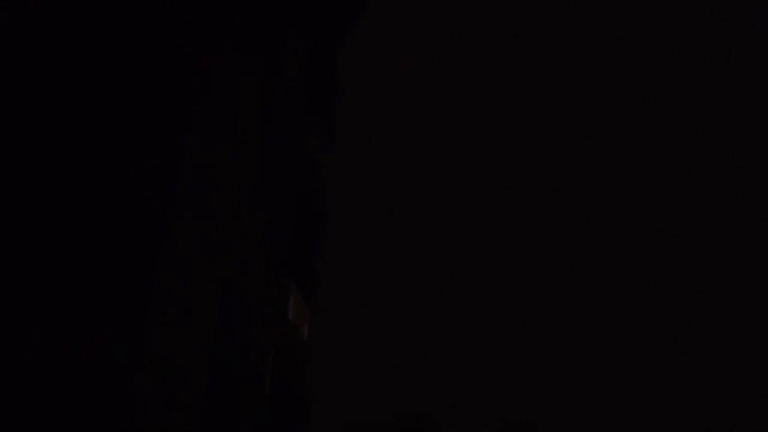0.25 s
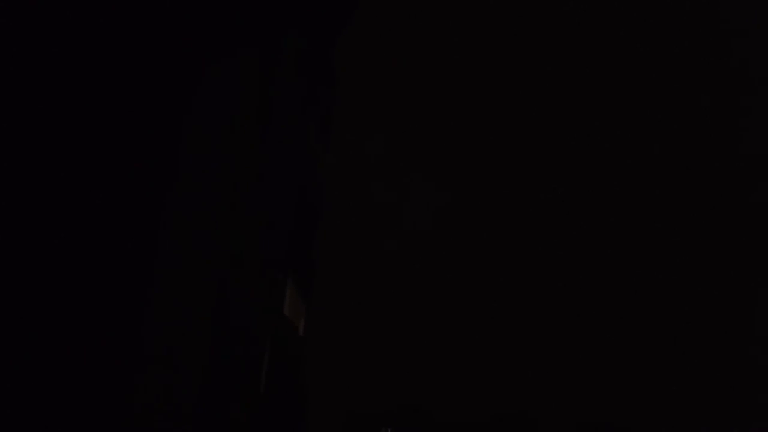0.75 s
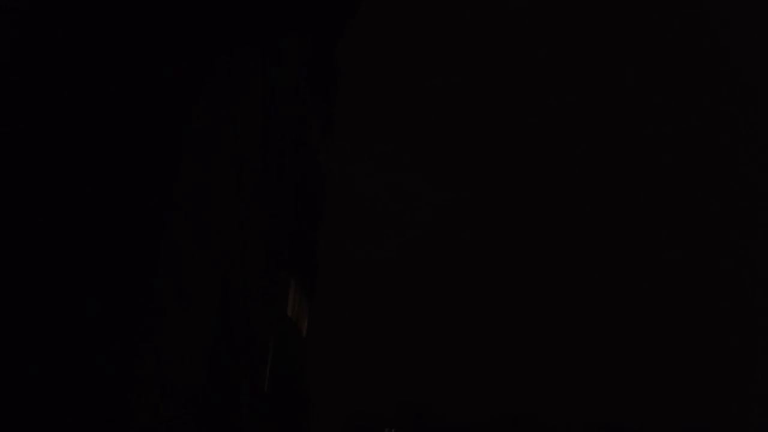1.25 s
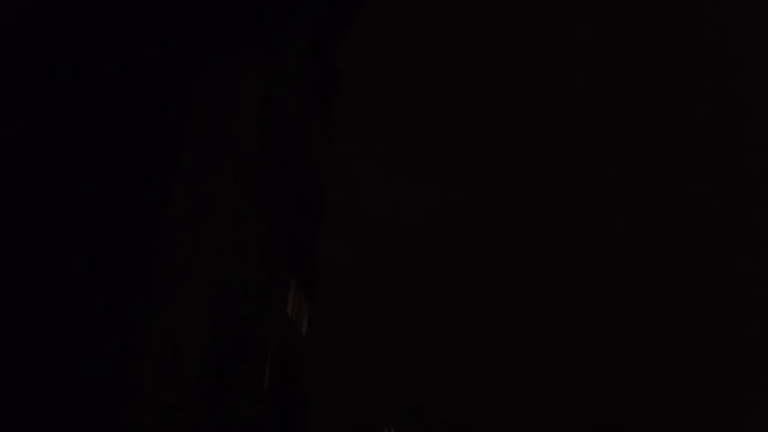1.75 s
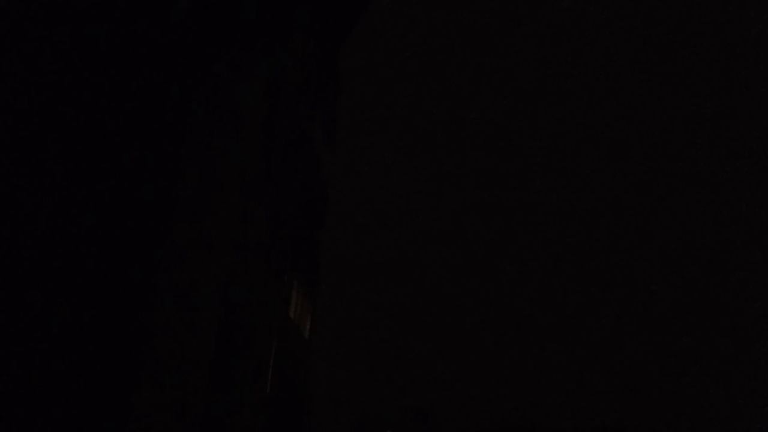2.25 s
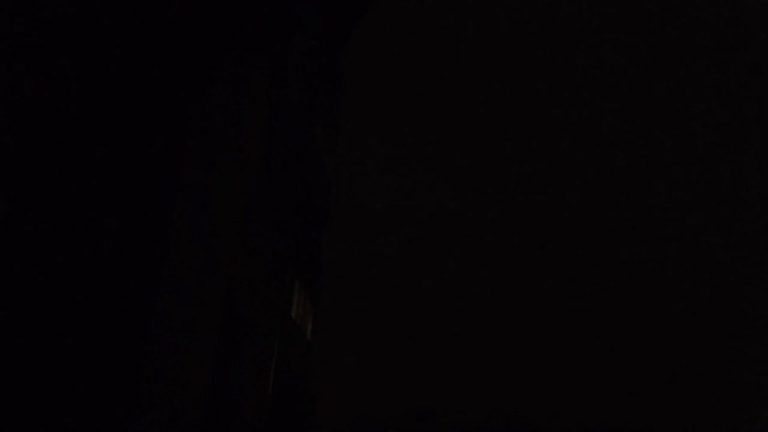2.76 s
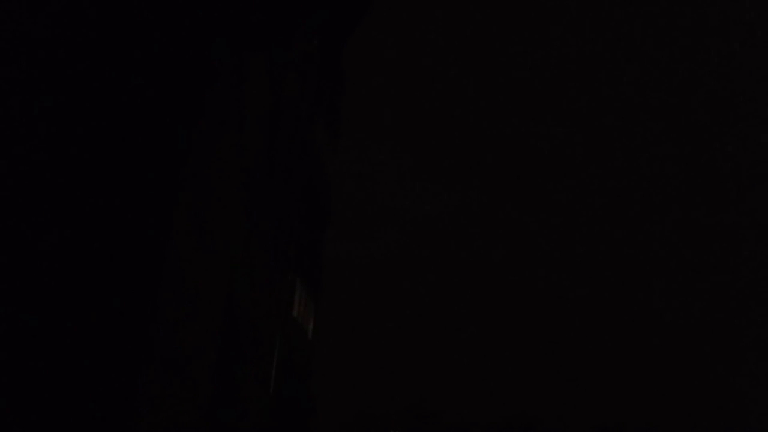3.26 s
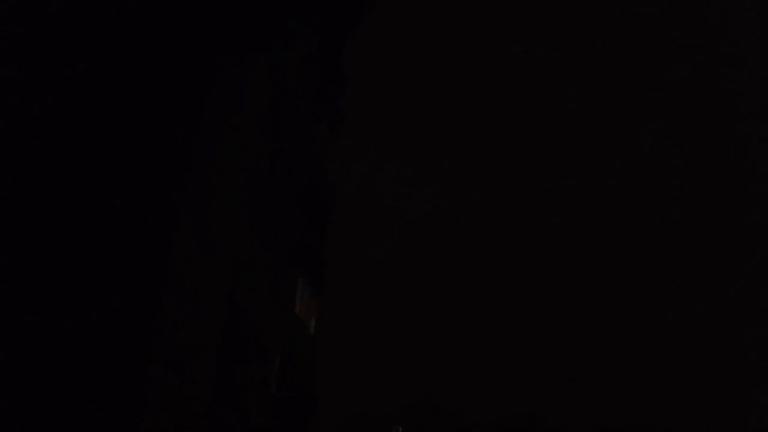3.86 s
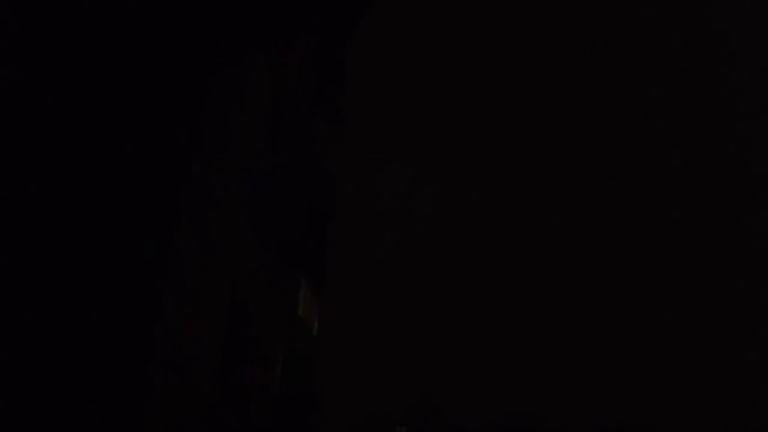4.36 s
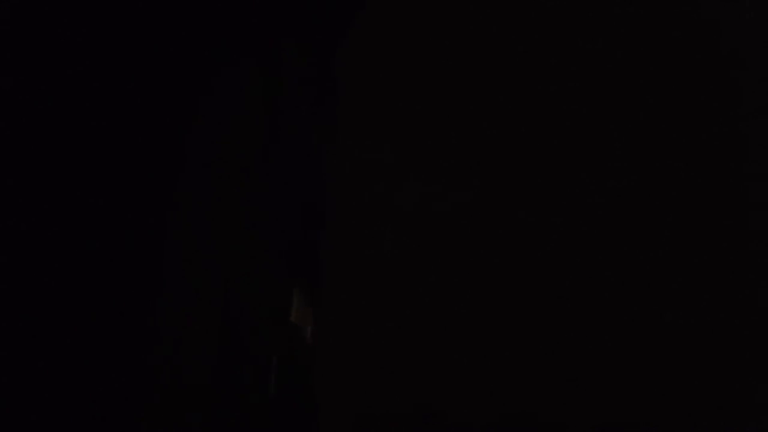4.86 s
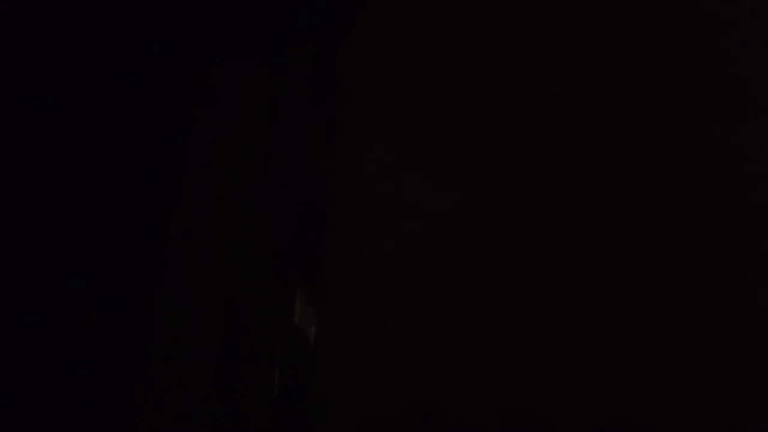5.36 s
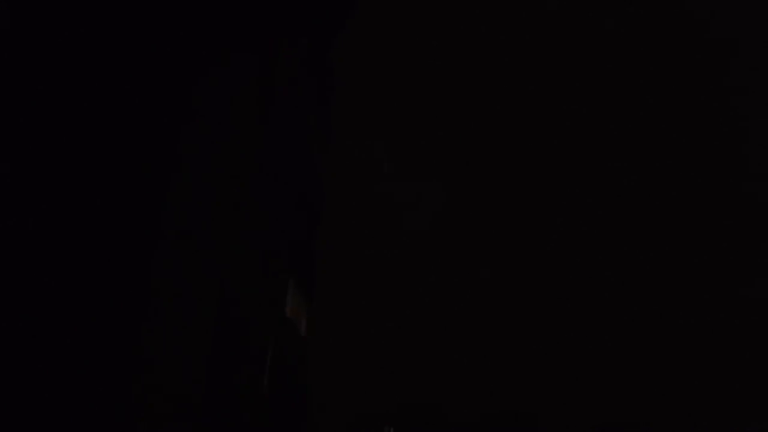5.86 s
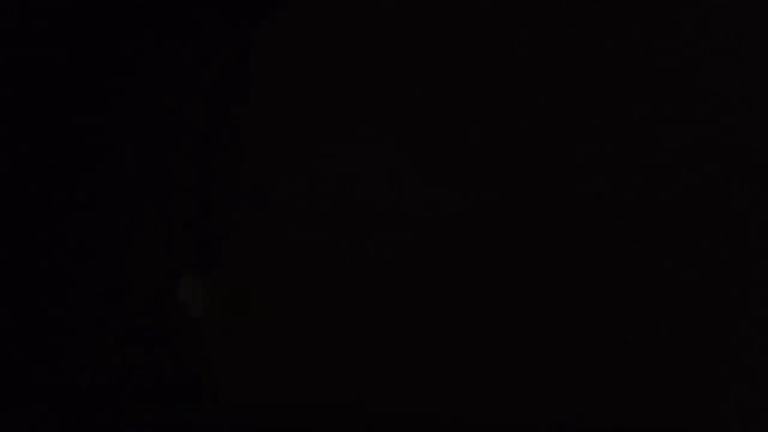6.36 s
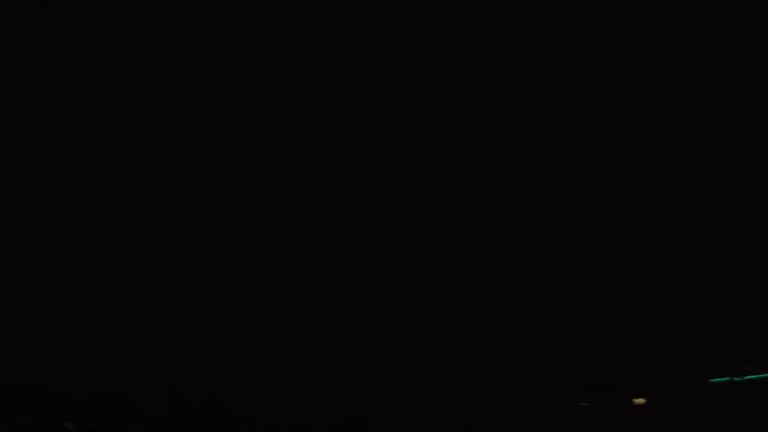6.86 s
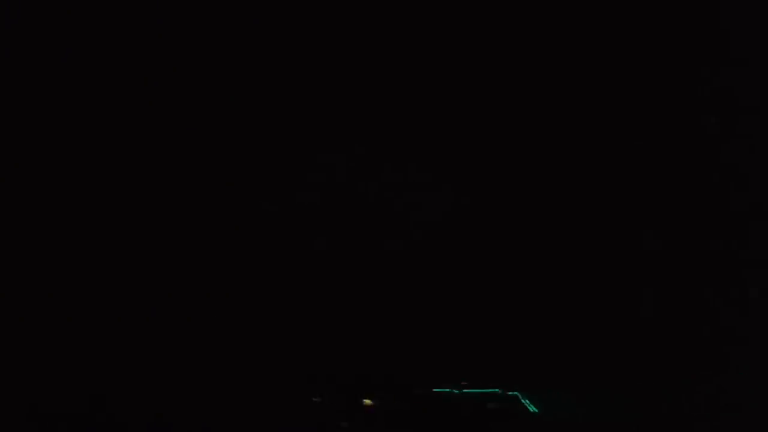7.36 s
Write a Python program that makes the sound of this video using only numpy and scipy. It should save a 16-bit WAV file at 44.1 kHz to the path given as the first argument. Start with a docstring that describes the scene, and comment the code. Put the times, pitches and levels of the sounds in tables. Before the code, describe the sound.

Heavy night rain hisses steadily while distant thunder rolls low, swells again, then fades as a few close drops tick and splash.

```python
"""Heavy night rain in mono from a sheltered spot: a dense wash of drops under a fine patter, made of noise
and random impulses. A dull roar of far rain sinks beneath it. Distant thunder, coloured from scattered
shocks, rolls from the start and swells again in the third second. Big drops then tick and splash close by,
as short filtered noise bursts, while the thunder fades to a faint echo.
Near the end the rain grows louder and brighter."""
import sys
import numpy as np
from scipy import signal
from scipy.fft import rfft, irfft, next_fast_len
from scipy.io import wavfile
from scipy.ndimage import uniform_filter1d, map_coordinates

SR = 44100
rng = np.random.default_rng(int(sys.argv[2]) if len(sys.argv) > 2 else 0)


def output_pcm(signal):
    """Save a mono or channel-first signal as 16-bit PCM at the path in sys.argv[1].

    Samples are clipped to [-1, 1] before scaling.
    """
    pcm = np.clip(np.atleast_2d(signal).T, -1, 1) * 32767
    wavfile.write(sys.argv[1], SR, np.round(pcm).astype(np.int16))


N = 335601  # length in samples


def amp(db):
    """Decibels to gain."""
    return 10 ** (np.asarray(db) / 20)


def unit(x):
    """Scale x to rms 1."""
    return x / np.sqrt(np.mean(x ** 2) + 1e-20)


def curves(rows):
    """Join the rows by straight lines: one value per sample for each column after the time."""
    seconds, *columns = np.transpose(rows)
    return [np.interp(np.arange(N) / SR, seconds, column) for column in columns]


def wobble(rate):
    """A smooth random curve through rate knots a second."""
    knots = rng.standard_normal(int(N * rate / SR) + 4)
    return map_coordinates(knots, [np.arange(N) * rate / SR])


def filtered(x, response):
    """Multiply the spectrum of x by a response of frequency, padded against wrap-around."""
    size = next_fast_len(N + SR // 2)
    spectrum = rfft(x, size) * response(np.fft.rfftfreq(size, 1 / SR))
    return irfft(spectrum, size)[:N]


def coloured(x, points):
    """Pass x through a (Hz, dB) spectrum read on a log frequency axis, then scale to rms 1."""
    point_hz, point_db = np.transpose(points)

    def response(hz):
        return amp(np.interp(np.log(hz + 1), np.log(point_hz), point_db))

    return unit(filtered(x, response))


def impacts(rate, spread_db):
    """Impulses at random moments, rate a second, of either sign and log-normal sizes up to a largest one."""
    draw = rng.standard_normal((int(rate * N / SR), 2))
    signs = np.sign(draw[:, 0])
    sizes = signs * amp(spread_db * np.minimum(draw[:, 1], 2))
    moments = rng.integers(N, size=len(sizes))
    return unit(np.bincount(moments, sizes, N))


def patchy_noise(patchy_db):
    """White noise whose bands swell and sink on their own, by patchy_db rms."""
    noise = signal.stft(rng.standard_normal(N), nperseg=512)[2]
    patches = rng.standard_normal(noise.shape)
    patches = uniform_filter1d(patches, size=8, axis=0)  # across frequency
    patches = uniform_filter1d(patches, size=14, axis=1)  # along time
    return unit(signal.istft(noise * amp(patchy_db * unit(patches)), nperseg=512)[1][:N])


# Strength of the rain, steady until a late surge. # Each row: time in seconds, rain level in dB (before the
# lift and the stretching of its swings below).
RAIN_STRENGTH = [(0, -31), (2.2, -31.5), (3.05, -30.5), (3.7, -31.5), (5.45, -31), (6.05, -31), (6.8, -30),
                 (7.28, -28.5), (7.61, -29)]
# Colour of the rain. Each row: frequency in Hz, relative level in dB.
RAIN_COLOUR = [(30, -34), (120, -19), (300, -13), (600, -10.5), (1000, -6), (2000, -3.5), (2700, -.7),
               (3300, 0.3), (4200, -4.5), (5300, -9), (6600, -22), (8200, -28.5), (12000, -35.5),
               (15500, -44)]


def rain():
    """Countless drops merge into a wash; nearer ones stand out in small clumps of patter."""
    strength_db, = curves(RAIN_STRENGTH)
    clumps = amp(1.4 * wobble(rate=110))
    patter = unit(impacts(rate=3000, spread_db=4.0) * clumps)
    wash = patchy_noise(patchy_db=0.23)
    sound = coloured(wash + amp(-6.5) * patter, RAIN_COLOUR)
    # the low body comes from all around and hardly follows the nearby splashing
    body = filtered(sound, lambda hz: 1 / (1 + (hz / 2900) ** 8))
    splashing = sound - body
    usual_db = np.median(strength_db)
    surge_db = strength_db - usual_db + 0.21 * wobble(rate=18)
    # the treble exaggerates each surge, so louder rain is brighter
    surging = body * amp(0.052 * surge_db) + splashing * amp(1.36 * surge_db)
    return amp(usual_db + 3.0) * surging


# The dull roar of rain farther off. Each row: time in seconds, rms level in dB.
FAR_LEVEL = [(0, -40.5), (1.3, -46.5), (3.8, -47), (4.3, -49), (7.61, -57)]
# Colour of the roar. Each row: frequency in Hz, relative level in dB.
FAR_COLOUR = [(15, -22), (45, -5), (100, -19), (250, -6), (420, 2), (750, -0.5), (1100, -10), (2000, -19),
              (5000, -60)]


def far_rain():
    """Rain farther off loses its treble on the way and slowly dies down."""
    level_db, = curves(FAR_LEVEL)
    return amp(level_db) * coloured(patchy_noise(patchy_db=0.0), FAR_COLOUR)


# Peals of thunder. Each row: start in seconds, hold in seconds, deep boom level in dB, roll level in dB
# (each peal alone, before it joins the others in power).
THUNDER_PEALS = [(0.11, 0.11, -50, -46), (0.244, .2, -49, -43), (0.443, .1, -57, -37.5),
                 (0.7, .06, -66, -46), (2.13, 0.074, -60, -45), (2.41, .04, -50, -43.5),
                 (2.67, .2, -49, -37.2), (2.8, .12, -45, -41.5), (3.08, .02, -47.5, -44),
                 (3.35, .25, -55, -44.5), (4.5, .95, -57, -52.5)]
PEAL_ATTACK_S, PEAL_FADE_DB_PER_S = 0.035, 90
# the rumble between the peals holds, then dies away
RUMBLE_BOOM_DB, RUMBLE_ROLL_DB = -66, -47.5
RUMBLE_END_S, RUMBLE_FADE_DB_PER_S = 3.92, 40
# the faint long echo outlasts it
ECHO_BOOM_DB, ECHO_ROLL_DB, ECHO_FADE_DB_PER_S = -60.5, -50, 0.4


def thunder_strength():
    """Gains of the boom and of the roll: peals, rumble and echo add in power."""
    t = np.arange(N) / SR

    def fade(from_s, db_per_s):
        return amp(-db_per_s * np.maximum(t - from_s, 0))

    rumble = fade(RUMBLE_END_S, RUMBLE_FADE_DB_PER_S)
    echo = fade(0, ECHO_FADE_DB_PER_S)
    parts = [np.outer(amp([RUMBLE_BOOM_DB, RUMBLE_ROLL_DB]), rumble),
             np.outer(amp([ECHO_BOOM_DB, ECHO_ROLL_DB]), echo)]
    for start_s, hold_s, boom_db, roll_db in THUNDER_PEALS:
        attack = np.clip((t - start_s) / PEAL_ATTACK_S, 0, 1)
        peal = attack * fade(start_s + PEAL_ATTACK_S + hold_s, PEAL_FADE_DB_PER_S)
        parts.append(np.outer(amp([boom_db, roll_db]), peal))
    return np.linalg.norm(parts, axis=0)


# Colour of the deep boom. Each row: frequency in Hz, relative level in dB.
BOOM_COLOUR = [(12, -37), (28, -17), (52, 2.5), (75, -2), (105, 2), (160, -30), (400, -62)]
# Colour of the higher roll. Each row: frequency in Hz, relative level in dB.
ROLL_COLOUR = [(60, -38), (110, -9), (138, 2.5), (195, -2), (250, 0), (410, -2), (550, -10.5), (1000, -28),
               (2500, -60)]


def thunder():
    """Shocks from along the lightning channel arrive scattered and dulled by kilometres of air."""
    boom_gain, roll_gain = thunder_strength()
    boom = boom_gain * coloured(impacts(rate=610, spread_db=1.5), BOOM_COLOUR)
    roll = roll_gain * coloured(impacts(rate=1600, spread_db=1.5), ROLL_COLOUR)
    return (boom + roll) * amp(0.92 * wobble(rate=16))


# Big drops close by.
# Each row: landing time in seconds, peak of the tick in dB, peak of the splash in dB.
NEAR_DROPS = [(2.468, -42, -33), (3.579, -38, -31), (4.4303, -33, -25), (4.978, -54, -21.5),
              (5.043, -42, -22), (5.389, -52, -20.5), (5.487, -46, -22), (5.646, -48, -32)]
TICK_HZ, SPLASH_HZ = 12600, 4800
TICK_T60_S, SPLASH_T60_S = 0.014, 0.016  # time for the noise to decay by 60 dB, before the band filter


def noise_burst(centre_hz, t60):
    """Decaying noise through four equal resonances in a row, at peak 1."""
    t = np.arange(SR // 20) / SR
    hz = np.fft.rfftfreq(len(t), 1 / SR)
    noise = rng.standard_normal(len(t)) * amp(-60 * t / t60)
    resonance = 1 / (1 + 1j * 1.43 * (hz / centre_hz - centre_hz / (hz + 1)))
    burst = irfft(rfft(noise) * resonance ** 4, len(t))
    return burst / np.abs(burst).max()


def drips():
    """Each near drop lands with a bright tick and bursts in a few milliseconds of lower splash."""
    out = np.zeros(N + SR)
    for land_s, tick_db, splash_db in NEAR_DROPS:
        tick = amp(tick_db) * noise_burst(TICK_HZ, TICK_T60_S)
        splash = amp(splash_db) * noise_burst(SPLASH_HZ, SPLASH_T60_S)
        out[round(land_s * SR):][:len(tick)] += tick + splash
    return out[:N]


def scene():
    """Both channels carry the same sound."""
    mono = rain() + far_rain() + thunder() + drips()
    return np.array([mono, mono])


TOP_HZ = 15740


def record(dry):
    """The recorder keeps nothing above its band limit."""
    return np.array([filtered(channel, lambda hz: hz < TOP_HZ) for channel in dry])


dry = scene()
out = record(dry)
output_pcm(out)
```